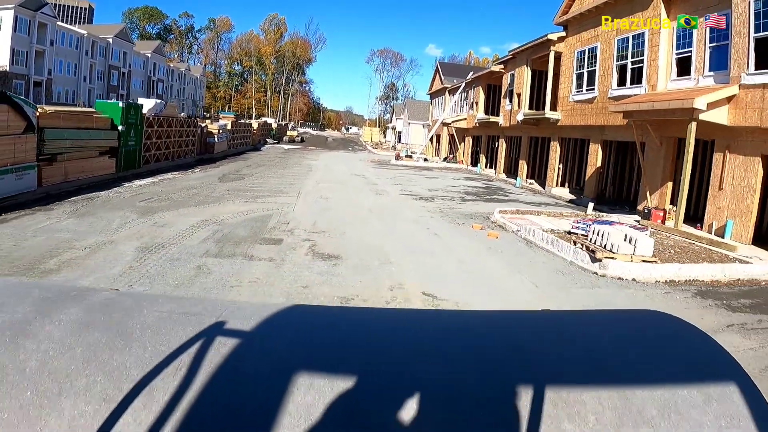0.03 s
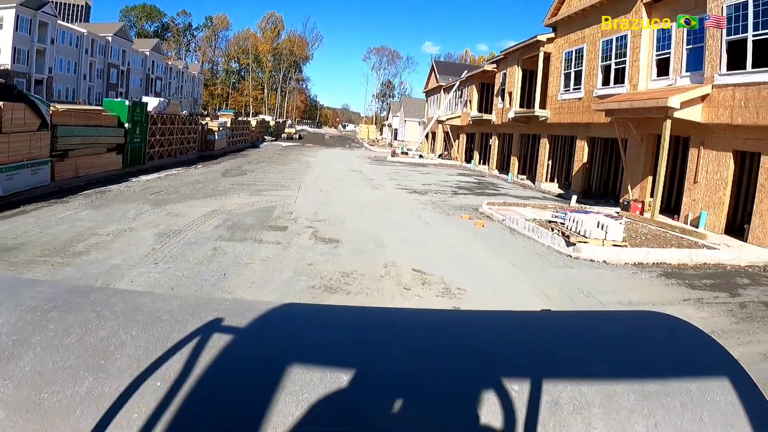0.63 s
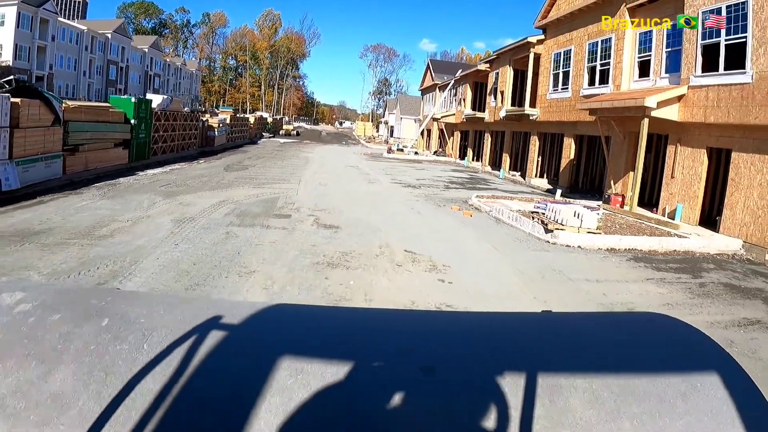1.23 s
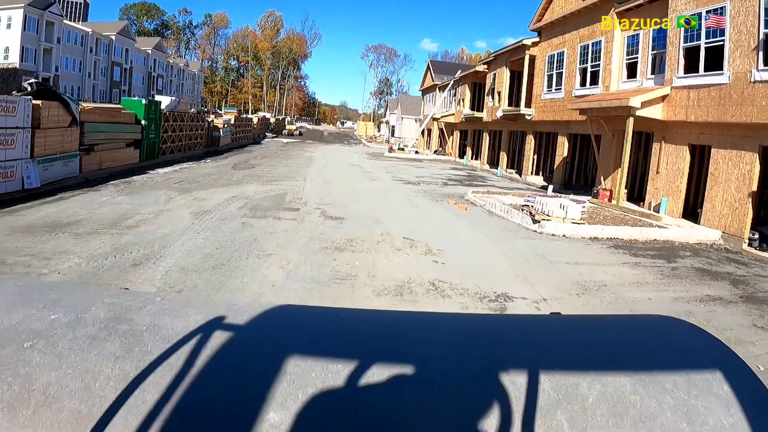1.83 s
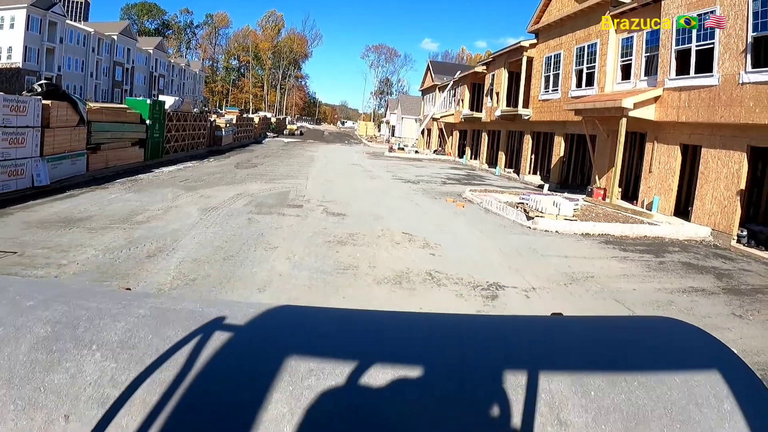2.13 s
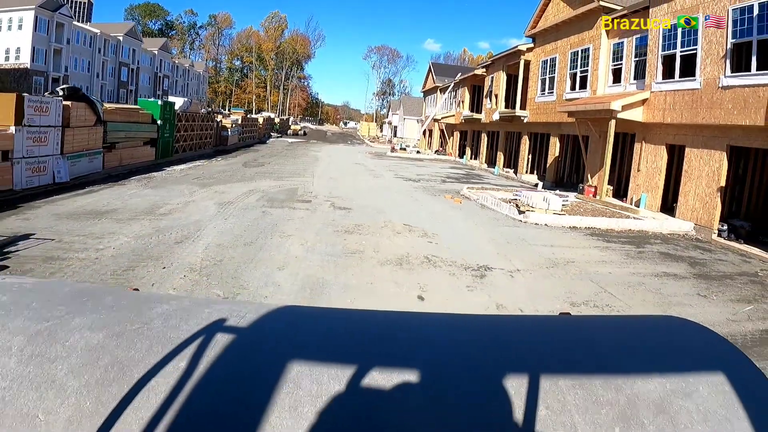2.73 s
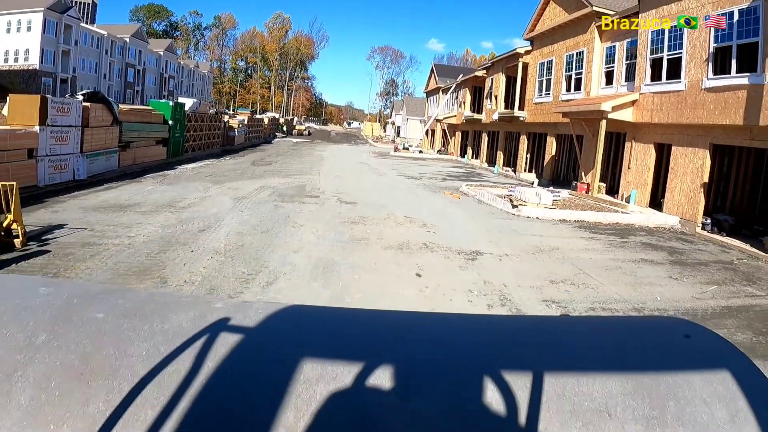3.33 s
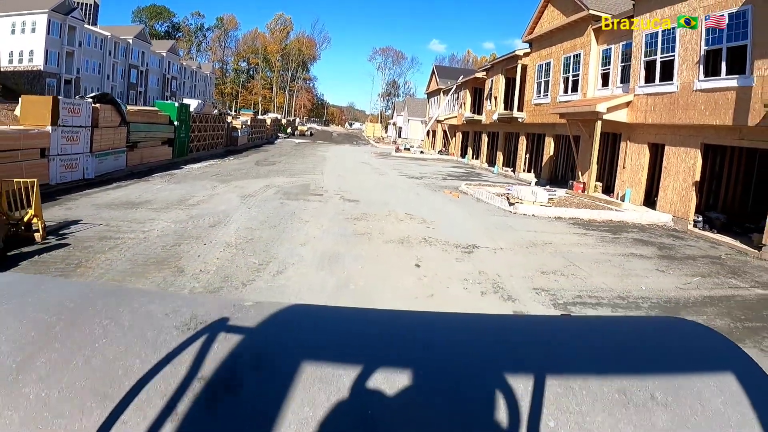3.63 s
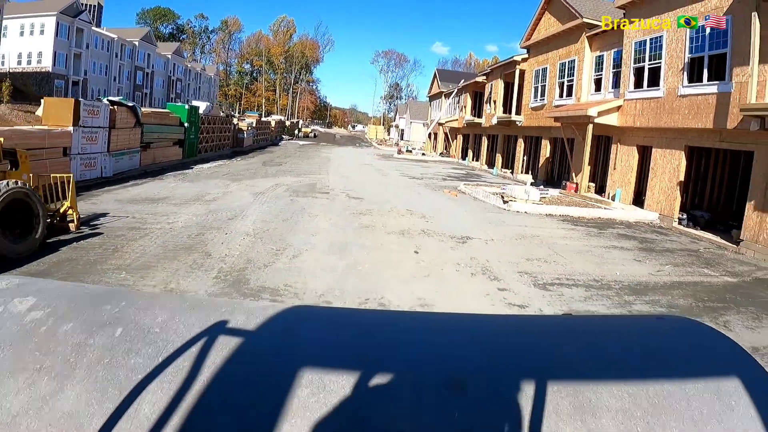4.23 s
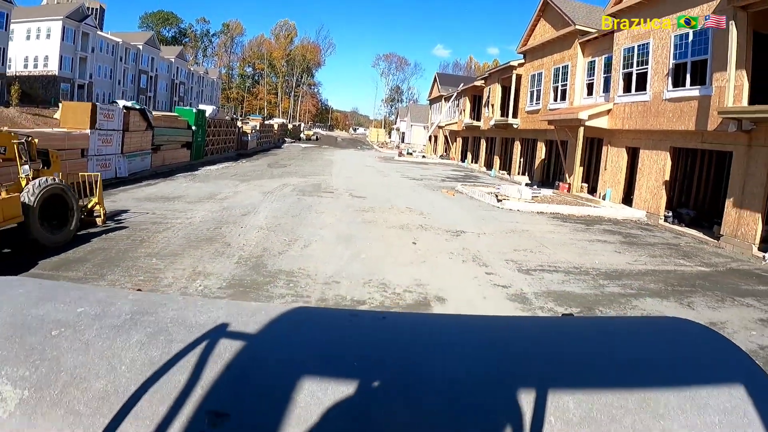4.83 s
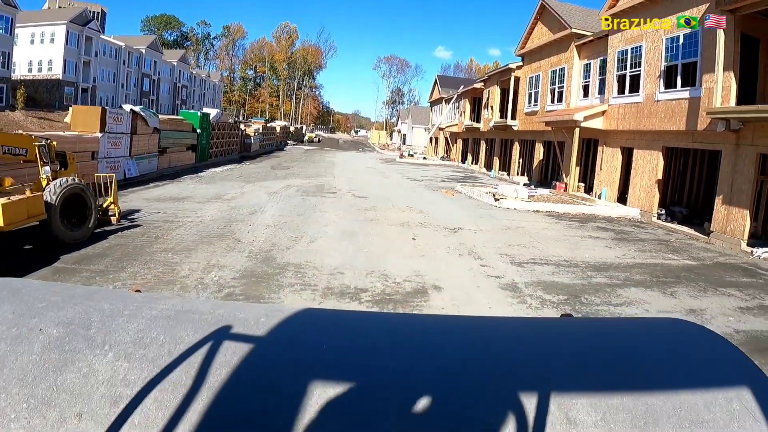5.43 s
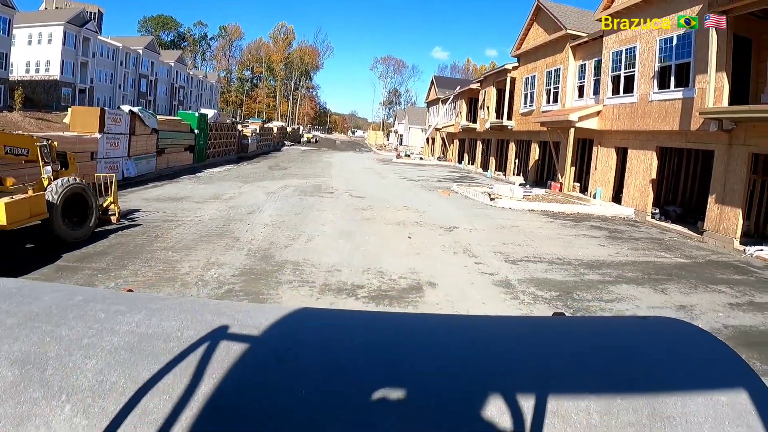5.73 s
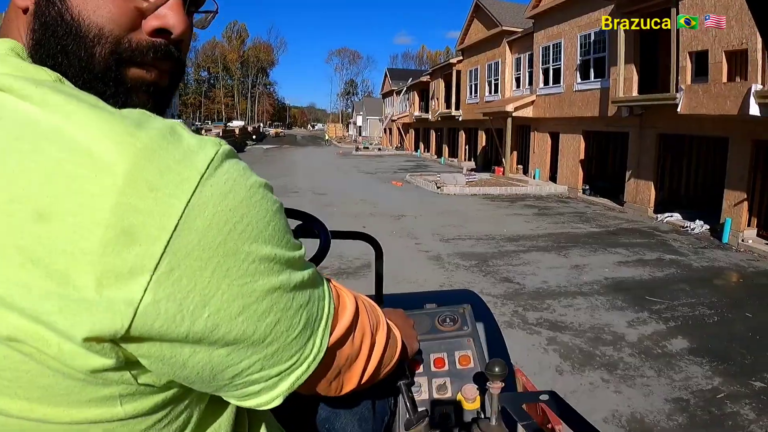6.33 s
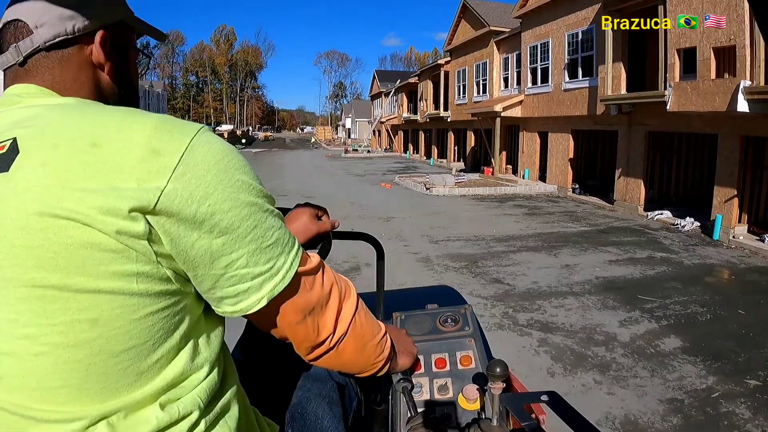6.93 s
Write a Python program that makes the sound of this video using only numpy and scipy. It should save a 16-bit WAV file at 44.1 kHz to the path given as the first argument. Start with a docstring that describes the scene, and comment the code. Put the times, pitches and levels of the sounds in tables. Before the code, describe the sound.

A road roller's vibrating drum pounds a gravel lane with a deep, fast throb that rattles its steel panels. About halfway through, the pounding slows and stops amid gritty scrapes. The diesel engine and a hydraulic whine grow louder over crunching stones. Near the end, a click shifts the sound from the front of the machine to a deeper drone behind the seat.

```python
"""Road roller on gravel

A roller's vibrating drum pounds a gravel lane and rattles its steel panels. The drum runs down with
gritty scrapes, and the three-cylinder diesel and its whining hydraulic drive grow louder over crunching
stones. Near the end, with a click, the listener jumps from the front to behind the driver's seat."""
import sys
import numpy as np
from scipy import signal
from scipy.fft import rfft, irfft, next_fast_len
from scipy.io import wavfile
from scipy.ndimage import uniform_filter1d, minimum_filter1d, map_coordinates

SR = 44100
rng = np.random.default_rng(int(sys.argv[2]) if len(sys.argv) > 2 else 0)


def unload_wav(signal):
    """Save mono or channel-first audio to the path in sys.argv[1] as 16-bit WAV at rate SR, clipped to [-1, 1]."""
    wavfile.write(
        sys.argv[1],
        SR,
        np.round(np.clip(np.atleast_2d(signal).T, -1, 1) * 32767).astype(np.int16),
    )


N = 308700

# The engine's hum notes: cycles_per_crank_turn, front_level_db (relative), seat_level_db
ENGINE_TONES = [(1.5, -16, -38), (3, -7.5, -19), (4.5, -11, -25.5), (6, -18.5, -32), (7, -16.5, -40),
                (8, -9.5, -26), (9, -12, -34), (14, -20, -46), (16, -16.5, -39), (17, -22, -49.5)]
CYLINDERS, PUMP_PULSES = 3, 12  # the pump pulses this often in each turn of the engine's crank
DRUM_HZ, DRIVE_OFF_S, REST_S = 32.78, 2.97, 3.93  # the drum's weight spins, coasts, then comes to rest
LEAVE_FRONT_S, REACH_SEAT_S = 6.038, 6.051
LULL = (2.19, 0.44, -3)  # clatter, panels and pump ease off together: middle_s, half_length_s, change_db


def drum(turns):
    """An off-centre weight pushes the drum into the ground once a turn, and the springy frame rebounds."""
    # How strongly the frame answers a push: pitch_hz, level_db
    frame_response = [(17, -14.5), (24, -4), (30, 2.5), (33, 0), (48, 3.5), (66, 5), (77, 3), (88, -8.5),
                      (98, -4), (131, -16)]
    hz, db = np.transpose(frame_response)
    speed, settled = drum_speed(), 1 - shaking()
    overtone_drop_db = 4.5 * speed / DRUM_HZ  # slower thumps are sharper
    push = np.zeros(N)
    for k in range(5):
        uneven_db = 0.25 + k * (0.7 - 0.22 * shaking())  # the bouncing grows uneven as it slows
        size_db = np.interp((k + 1) * speed, hz, db) - k * overtone_drop_db + uneven_db * wobble(14)
        push -= amp(size_db) * np.cos(2 * np.pi * (k + 1) * turns + 0.5 + 0.36 * settled)
    return push * amp(-15 - 1.6 * settled + rest_db())


def drum_speed():
    """The weight's turns per second: steady until the drive is cut, then friction slows it."""
    return DRUM_HZ * np.exp(-np.maximum(clock() - DRIVE_OFF_S, 0) / 1.63)


def shaking():
    """How hard the drum shakes the machine, from 1 down to 0 as it stops."""
    return np.interp(clock(), [DRIVE_OFF_S, REST_S], [1, 0])


def rest_db():
    """The shaking dies by 118 dB a second as the weight comes to rest."""
    return -118 * np.maximum(clock() - REST_S, 0)


def frame_boom():
    """As the thumps slow, the frame swings on its rubber mounts at its own pitch, 52 Hz."""
    # The frame's swings: peak_s, level_db, rise_s, fall_s
    swings = [(3.53, -24, .06, .05), (3.71, -17.5, .06, .06)]
    gain = sum(amp(db) * burst(s, rise, fall) for s, db, rise, fall in swings)
    return gain * tone(52 * clock(), multiple=1, drift=0.24, flutter_db=2.5)


def panels(turns):
    """Each thump rattles the panels and booms the hood; slower shaking gives less rattle, more boom."""
    # The rattling steel: pitch_hz, level_db
    rattle_colour = [(880, -15), (1500, -4), (1860, -9.5), (2150, -12.5), (2500, -6.5), (3000, -2.5),
                     (3450, -7), (4200, -9.5), (5200, -6), (5950, -14.5), (7200, -16), (8000, -23.5),
                     (8600, -22.5), (10600, -34.5), (12600, -38), (15600, -69), (22000, -120)]
    # The booming engine hood: pitch_hz, level_db
    hood_colour = [(140, -24), (220, -8.5), (290, 4), (380, -4), (450, -10.5), (510, -6), (660, -10.5),
                   (740, -9), (900, -12.5), (1100, -18.5), (1400, -25.5)]
    jolts = recurring(turns, repeat=.1) * throb(turns, depth_db=0.84, lag=.1)
    rattle = unit(panel_ring(coloured(jolts, rattle_colour), ring_db=-4.5))
    hood = coloured(recurring(turns, repeat=0.23) * throb(turns, depth_db=-3.5, lag=0.89), hood_colour)
    slowing = 1 - drum_speed() / DRUM_HZ
    shaken = amp(-46.5 - 9 * slowing) * rattle + amp(-35 + 12 * slowing) * hood
    return shaken * amp(swell(*LULL) + rest_db())


def loose_panel(turns):
    """The drum's high overtones ring a loose panel; its two notes keep their pitch and fade as it slows."""
    # The notes: pitch_hz, width_hz, level_db, fade_below_drum_hz, swell_s, half_length_s, swell_db
    notes = [(1200, 30, -44, 29.0, 1.87, .11, 8), (1088, 44, -53.5, 27.3, 3.17, .12, 14)]
    overtones = unit(sum(tone(turns, k, drift=.32, flutter_db=1.4) for k in range(30, 43)))
    out = np.zeros(N)
    for hz, width, db, fade_below_hz, *swelling in notes:
        note = filtered(overtones, lambda f: resonance(f, hz, width))
        note /= np.std(note[clock() < DRIVE_OFF_S])
        fast_enough = (1 + np.tanh(drum_speed() - fade_below_hz)) / 2
        out += amp(db + swell(*swelling)) * fast_enough * note
    return out


def engine_front(crank):
    """From the front, burning fuel makes the exhaust roar and hum and the engine block clatter."""
    # The exhaust's roar: pitch_hz, level_db
    exhaust_colour = [(18, -41), (30, -19), (62, 0), (93, -4), (160, 0), (226, -5), (302, -3.5), (366, -9),
                      (419, -11), (475, -14), (567, -11.5), (697, -16), (800, -15), (1040, -42.5),
                      (1760, -120)]
    # The block's clatter: pitch_hz, level_db
    clatter_colour = [(260, -26), (450, -1), (505, 3.5), (566, -3), (600, -4), (645, -7), (713, -2.5),
                      (860, -5.5), (924, -8), (1340, -11), (1850, -17.5), (2400, -22.5), (3600, -28.5),
                      (5000, -39.5), (5900, -45), (7400, -46.5), (8800, -51), (11000, -62), (13000, -60),
                      (14500, -75)]
    roar = amp(1.5) * coloured(combustion(crank, repeat=0.15, pulse_db=2.6), exhaust_colour)
    hum_db = swell(5.9, .45, 6.8)  # only the note at twice the firing rate swells
    hum = sum(amp(db + hum_db * (k == CYLINDERS)) * tone(crank, k, drift=.45, flutter_db=1.5)
              for k, db, _ in ENGINE_TONES)
    knocks = sheet_metal(combustion(crank, repeat=0.19, pulse_db=-0.1), ring_db=-9, ring_s=0.093)
    exhaust_db = ease_up(3, 5, first_db=-35.5, gained_db=16)
    clatter_db = ease_up(2.5, 5.5, first_db=-35, gained_db=8.5) + swell(*LULL)
    return amp(exhaust_db) * (roar + hum) + amp(clatter_db) * coloured(knocks, clatter_colour)


def engine_seat(crank):
    """Behind the seat the exhaust drones deeply, cooling air hisses and the pump's whine sinks away."""
    # The exhaust's drone: pitch_hz, level_db
    drone_colour = [(18, -43), (30, -20), (50, -9), (72, -3), (95, -7), (128, -8.5), (168, -5), (225, -5.5),
                    (262, -10.5), (310, -9.5), (372, -10.5), (415, -15.5), (464, -15), (660, -16),
                    (839, -17.5), (1310, -22.5), (2500, -39.5), (3250, -71), (5500, -120)]
    # The cooling air: pitch_hz, level_db
    air_colour = [(1200, -29), (2200, -7), (3000, -2), (3700, 0), (5000, -8.5), (6000, -15), (7000, -16.5),
                  (9000, -25.5), (11300, -36), (12800, -28), (14400, -38)]
    drone = coloured(combustion(crank, repeat=0.16, pulse_db=0), drone_colour)
    air = sheet_metal(combustion(crank, repeat=.12, pulse_db=0.8), ring_db=-17, ring_s=.1)
    hiss = amp(-45) * coloured(air, air_colour)
    hum = sum(amp(db) * tone(crank, k, drift=0.2, flutter_db=2.2) for k, _, db in ENGINE_TONES)
    whine = tone(crank, PUMP_PULSES, drift=0.21, flutter_db=1)
    whine_db = -25 - 6.5 * np.maximum(clock() - REACH_SEAT_S, 0)
    return amp(-16.3 + 0.74 * wobble(7)) * drone + hiss + hum + amp(whine_db) * whine


def combustion(crank, repeat, pulse_db):
    """Noise that pulses as the cylinders fire, each one once in two crank turns."""
    return recurring(crank / 2, repeat, size=2400) * throb(crank * CYLINDERS / 2, pulse_db)


def pump(crank, turns):
    """The hydraulic pump whines, with a rougher note an octave up; the drum's shaking makes both throb."""
    # Quick swells and dips of the upper note: middle_s, half_length_s, change_db
    surges = [(4.41, .04, 4), (4.65, .025, 7), (4.715, .02, -8), (4.775, .028, 8), (4.825, .015, -8),
              (4.88, .025, 8), (5.01, .04, 4), (5.1, .018, -10), (5.16, .035, 5)]
    whine_db = ease_up(3, 4.5, first_db=-33, gained_db=9) + swell(3.2, .1, -8) + swell(5.55, .5, 3.2)
    octave_db = ease_up(3, 4, first_db=-44, gained_db=7) + swell(5.14, 0.63, 4.7)
    octave_db += sum(swell(*surge) for surge in surges)
    whine = tone(crank, PUMP_PULSES, drift=.16, flutter_db=1.2) * amp(1.1 * wobble(60))
    whine *= throb(turns, 1.8 * shaking(), lag=0.23)
    octave = tone(crank, 2 * PUMP_PULSES, drift=1.1, flutter_db=0) * throb(turns, 5 * shaking(), lag=0.78)
    octave = unit(octave * amp(3 * wobble(45)))
    # The shaking splits off one more note just below the octave.
    side_note = tone(2 * PUMP_PULSES * crank - turns, multiple=1, drift=.7, flutter_db=3) * shaking()
    return (whine * amp(whine_db) + octave * amp(octave_db) + side_note * amp(-46.5)) * amp(swell(*LULL))


def motor():
    """The drive motor's rough whine sets in as the drum coasts, sags, and beats against the pump's octave."""
    # The course of the whine: time_s, pitch_hz, level_db
    whine_path = [(3.3, 899.4, -60), (3.46, 874, -36), (3.6, 859, -40), (4.3, 854.3, -43.5),
                  (4.9, 867.5, -41), (5.7, 857.4, -40.5), (6.0, 842, -50)]
    hz, db = curves(whine_path)
    whine = tone(np.cumsum(hz) / SR, multiple=1, drift=1.13, flutter_db=1)
    return amp(db) * unit(whine * amp(2.5 * wobble(60)))


def gear(crank):
    """A gear sings at 18 times the crank's speed and grows louder with the engine."""
    level_db = ease_up(3.5, 5, first_db=-49.5, gained_db=13) + swell(5.75, 0.14, 10.2)
    return amp(level_db) * tone(crank, multiple=18, drift=.5, flutter_db=2)


def gravel():
    """Once the drum stops bouncing it stays on the ground and crunches steadily through the gravel."""
    # Gravel under the smooth drum: pitch_hz, level_db
    crunch_colour = [(700, -6), (1000, 3.5), (1400, 0.5), (1750, -4.5), (2100, -7), (2800, -9), (3600, -14),
                     (4200, -15), (5000, -21), (6500, -27), (8500, -34), (11000, -48), (14000, -64.5)]
    grains = coloured(noise() * amp(2.2 * wobble(400)), crunch_colour)
    return amp(ease_up(3.5, 4.15, first_db=-56, gained_db=16.8) + .7 * wobble(12)) * grains


def scrapes():
    """Grit dragged under the steel hisses in short swells that ring the panels, over a low grinding."""
    # Each scrape: peak_s, hiss_db (relative), grind_db, rise_s, fall_s
    drags = [(1.348, -39, -35, 0.032, 0.055), (2.96, -47.5, -42, 0.089, .1),
             (3.12, -51, -33.5, 0.04, 0.068), (3.345, -36, -25.5, 0.035, .11),
             (3.425, -45, -34, 0.012, 0.04), (3.595, -42.5, -36, .008, 0.076), (3.7, -43, -30, 0.036, 0.04),
             (3.872, -27, -30.5, 0.01, 0.04), (3.905, -32, -30, 0.038, 0.06)]
    # The hissing grit: pitch_hz, level_db
    grit_colour = [(530, -35.5), (900, -18), (1120, -3), (1540, -9), (3010, -14.5), (4600, -19),
                   (5340, -23.5), (5900, -27.5), (7400, -34.5), (8600, -36.5), (10500, -55), (14000, -68.5)]
    # Crushed stone heard through the drum: pitch_hz, level_db
    grind_colour = [(280, -13), (450, 4), (650, -3.5), (900, -12.5), (1500, -25.5)]
    grains = coloured(noise() * amp(2.1 * wobble(500)), grit_colour)
    hiss = sum(amp(db) * burst(s, rise, fall) for s, db, _, rise, fall in drags)
    grind = sum(amp(db) * burst(s, rise, fall) for s, _, db, rise, fall in drags)
    return amp(-2) * panel_ring(hiss * grains, ring_db=2) + grind * coloured(noise(), grind_colour)


def grit_spit():
    """A sharp spit of hiss as the drum stops; it rings briefly in the panels."""
    # The bright edge of a scrape: pitch_hz, level_db
    spit_colour = [(2200, -8.5), (4500, 1), (8000, -5.5), (10500, -26), (13500, -27), (14500, -32)]
    hiss = burst(3.87, rise_s=.005, fall_s=.035) * coloured(noise(), spit_colour)
    return amp(-39.5) * panel_ring(hiss, ring_db=-3.5)


def click():
    """One abrupt blip, about one cycle of 596 Hz, in the gap as the listener changes place."""
    age = clock() - 6.0441
    return amp(-13) * np.cos(2 * np.pi * 596 * age - .9) * (age >= 0) * (age < 0.0018)


def knock():
    """A soft, low bump of the bodywork behind the seat."""
    # The dull bump: pitch_hz, level_db
    bump_colour = [(170, -20), (240, -2), (295, 1), (380, -14), (600, -31)]
    return swell(6.835, .03, amp(-21)) * coloured(noise(), bump_colour)


def squeak():
    """A brief chirp of metal on metal, near 5350 Hz."""
    return swell(6.353, .007, amp(-47.5)) * np.sin(2 * np.pi * 5350 * clock() + 1.2 * wobble(500))


def pings():
    """Tiny, very high ticks, like chips of stone flicked against steel."""
    # Each tick: peak_s, level_db
    ticks = [(2.973, -71), (5.236, -69), (5.325, -70), (6.016, -61)]
    # The thin sound of a tick: pitch_hz, level_db
    tick_colour = [(6000, -24), (11000, -14), (12500, 0), (13600, -8), (14500, -24)]
    gain = sum(amp(db) * burst(s, rise_s=.004, fall_s=.007) for s, db in ticks)
    return gain * coloured(noise(), tick_colour)


def faint_hiss():
    """A steady hiss far behind everything else."""
    # The high hiss: pitch_hz, level_db
    hiss_colour = [(2000, 0), (9000, 3), (11200, -3.5), (13000, -0.5), (14500, -12)]
    return amp(-80.5) * coloured(noise(), hiss_colour)


def panel_ring(x, ring_db):
    """Add the ringing of the steel panels to a sound."""
    # The panels' own notes: pitch_hz, width_hz, level_db (relative)
    notes = [(1115, 48, 0.5), (2430, 60, -5), (2680, 40, -9), (2933, 24, 8), (3780, 120, -2.5),
             (4500, 55, -5.5), (4750, 66, -7.5), (5300, 40, 1.5), (7320, 90, -5), (7870, 56, 1)]
    ring = lambda f: sum(amp(db) * resonance(f, hz, width) for hz, width, db in notes)
    return filtered(x, lambda f: 1 + amp(ring_db) * ring(f))


def sheet_metal(x, ring_db, ring_s, size=4096):
    """Sheet metal adds a faint ring of many notes, which falls by 60 dB in ring_s."""
    tail = rng.standard_normal(size) * amp(-60 * np.arange(size) / SR / ring_s)
    return x + amp(ring_db) * signal.fftconvolve(x, tail / np.linalg.norm(tail))[:N]


def resonance(f, hz, width):
    """How a part that rings at hz answers shaking at the pitches f."""
    return 1j * f * width / (hz ** 2 - f ** 2 + 1j * f * width)


def tone(turns, multiple, drift, flutter_db):
    """A slightly unsteady note at a multiple of a shaft's speed, at strength 1."""
    phase = 2 * np.pi * (multiple * turns + rng.random()) + drift * wobble(9)
    return unit(np.sin(phase) * amp(flutter_db * wobble(14)))


def throb(turns, depth_db, lag=0):
    """A gain that swells once a turn and keeps the average power the same."""
    depth = depth_db * np.log(10) / 20
    return np.exp(depth * np.cos(2 * np.pi * (turns - lag))) / np.sqrt(np.i0(2 * depth))


def recurring(turns, repeat, size=1200):
    """Noise of which a share (repeat, 0 to 1) comes back alike every turn."""
    cycle = map_coordinates(rng.standard_normal(size), [turns % 1 * size], mode="grid-wrap")
    return np.sqrt(repeat) * cycle + np.sqrt(1 - repeat) * noise()


def swell(middle_s, half_length_s, height):
    """A smooth hump in time, or a dip if the height is negative."""
    return height * np.exp(-((clock() - middle_s) / half_length_s) ** 2)


def burst(peak_s, rise_s, fall_s):
    """A gain that climbs to 1 and dies away."""
    age = clock() - peak_s
    return np.exp(-np.where(age < 0, -age / rise_s, age / fall_s))


def ease_up(start_s, end_s, first_db, gained_db):
    """A level in dB that rises smoothly between two times."""
    share = np.clip((clock() - start_s) / (end_s - start_s), 0, 1)
    return first_db + gained_db * np.sin(np.pi / 2 * share) ** 2


def coloured(x, colour):
    """Shape a sound by (pitch_hz, level_db) points, fading steeply beyond them, at strength 1."""
    f, db = np.transpose(colour)
    edges = lambda hz: 1 / np.sqrt((1 + (f[0] / 2 / (hz + 1)) ** 8) * (1 + (hz / 2 / f[-1]) ** 8))
    return unit(filtered(x, lambda hz: amp(np.interp(np.log(hz + 1), np.log(f), db)) * edges(hz)))


def filtered(x, response):
    """Turn each pitch in a sound up or down by response(hz)."""
    size = next_fast_len(N + 8192)
    return irfft(rfft(x, size) * response(np.fft.rfftfreq(size, 1 / SR)), size)[:N]


def wobble(rate):
    """A smooth random curve through rate points a second."""
    return map_coordinates(rng.standard_normal(int(N * rate / SR) + 4), [clock() * rate])


def curves(rows):
    """One value per sample for each column after the time."""
    times, *columns = np.transpose(rows)
    return [np.interp(clock(), times, column) for column in columns]


def noise():
    """Fresh white noise."""
    return rng.standard_normal(N)


def amp(db):
    """Decibels to gain."""
    return 10 ** (np.asarray(db) / 20)


def unit(x):
    """Scale a sound to an average strength (rms) of 1."""
    return x / np.sqrt(np.mean(x ** 2) + 1e-20)


def clock():
    """The time of every sample, in seconds."""
    return np.arange(N) / SR


def scene():
    """Two shafts set the pace, the engine's crank and the drum's weight; heard from the front, then the seat."""
    # The pump follows the engine, which speeds up when the drum's load comes off: time_s, pitch_hz
    pump_pitch = [(0.0, 418.7), (2.3, 416.7), (2.93, 418), (3.2, 432.2), (3.35, 430.4), (3.65, 428.2),
                  (3.97, 426.1), (4.55, 422.8), (4.95, 428), (5.3, 425.7), (6.0, 421.3), (7.0, 418.8)]
    crank = np.cumsum(curves(pump_pitch)[0]) / SR / PUMP_PULSES  # crank turns so far
    turns = np.cumsum(drum_speed()) / SR - .42  # turns of the weight so far
    front = engine_front(crank) + pump(crank, turns) + motor() + gear(crank)
    front += drum(turns) + frame_boom() + panels(turns) + loose_panel(turns)
    front += gravel() + scrapes() + grit_spit() + pings()
    seat = engine_seat(crank) + squeak() + knock()
    at_front, at_seat = clock() < LEAVE_FRONT_S, clock() > REACH_SEAT_S
    mix = at_front * front + at_seat * seat + faint_hiss()
    # Fade for 1 ms on each side of the short gap between the two places.
    fades = uniform_filter1d(minimum_filter1d((at_front | at_seat) * 1., size=45), size=45)
    return (mix * fades + click())[None]


def record(dry):
    """Cut away everything above 14700 Hz."""
    return filtered(dry[0], lambda hz: hz < 14700)[None]


dry = scene()
out = record(dry)
unload_wav(out)
```